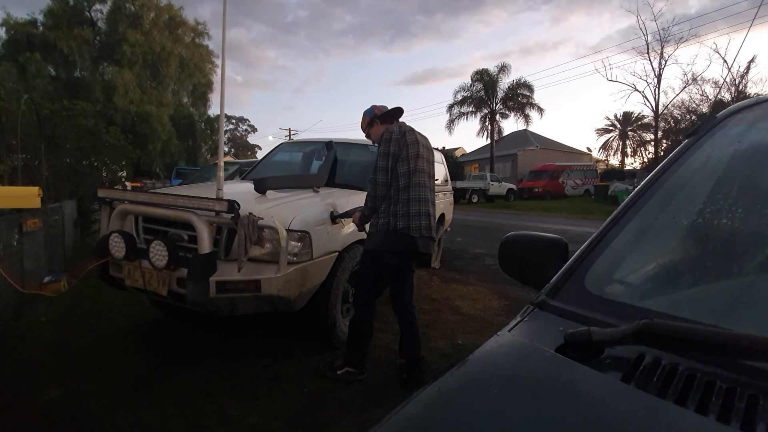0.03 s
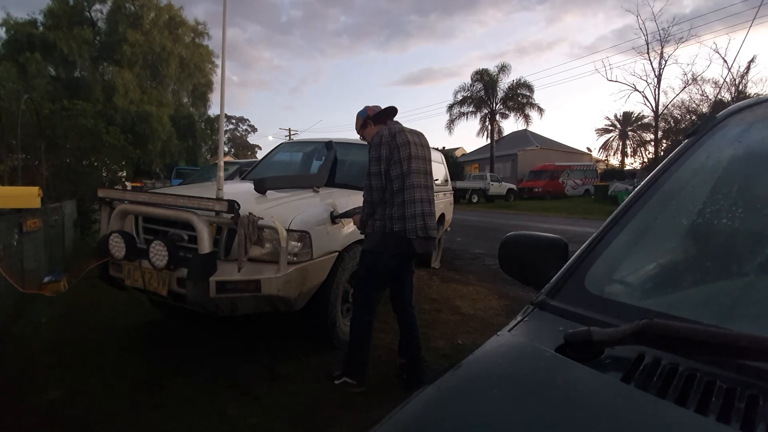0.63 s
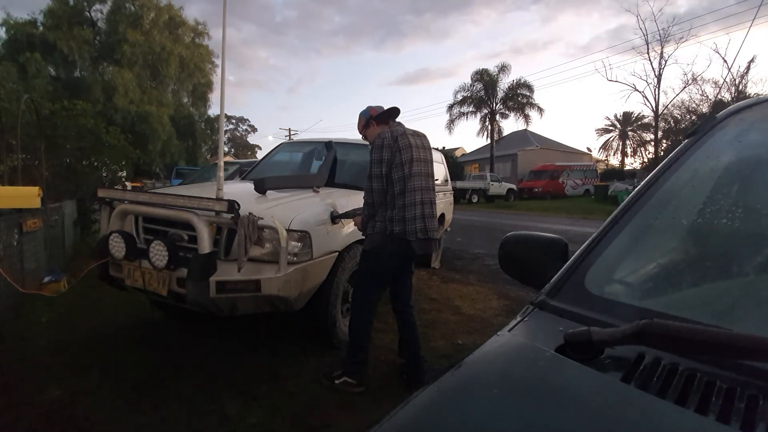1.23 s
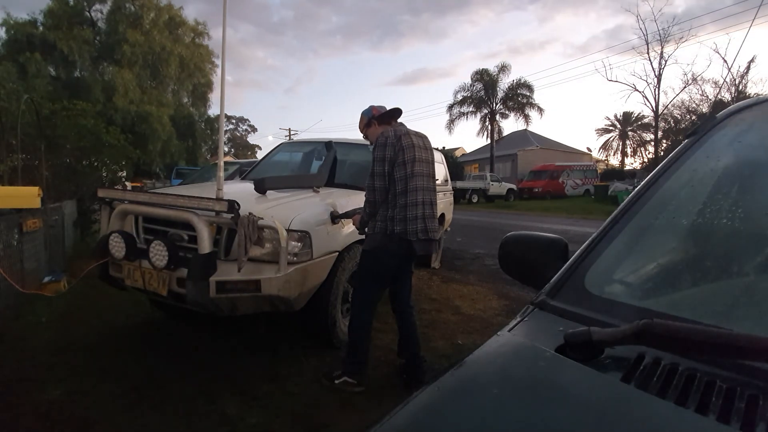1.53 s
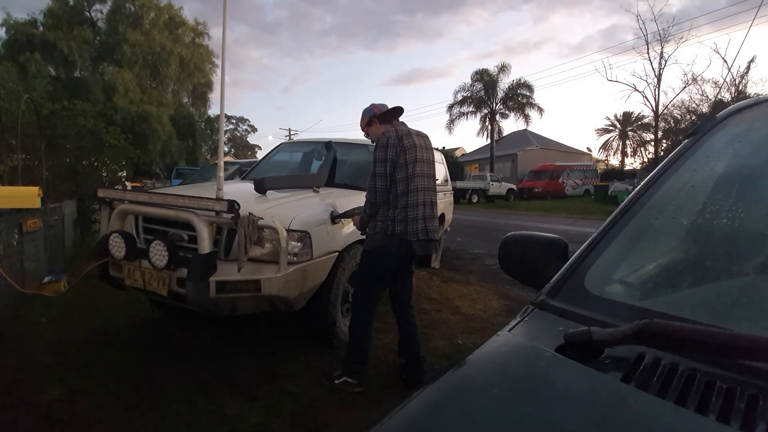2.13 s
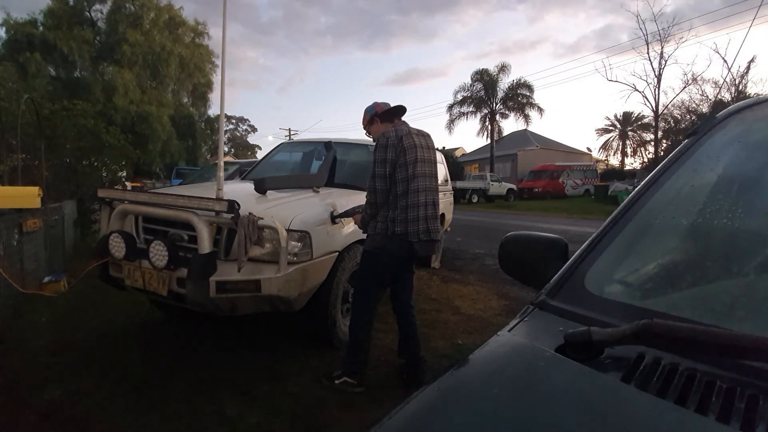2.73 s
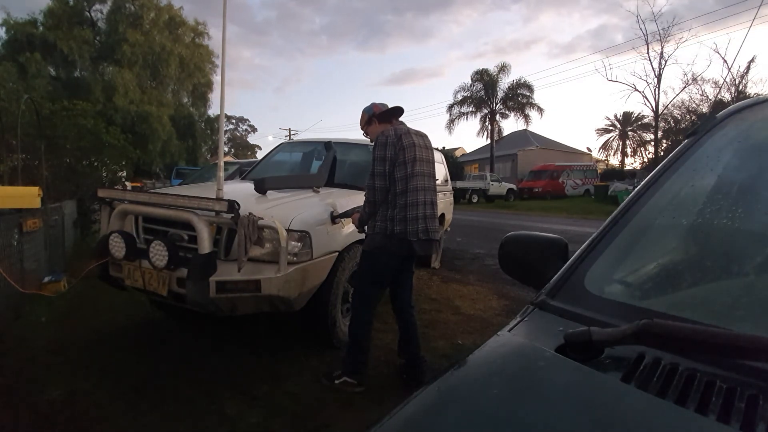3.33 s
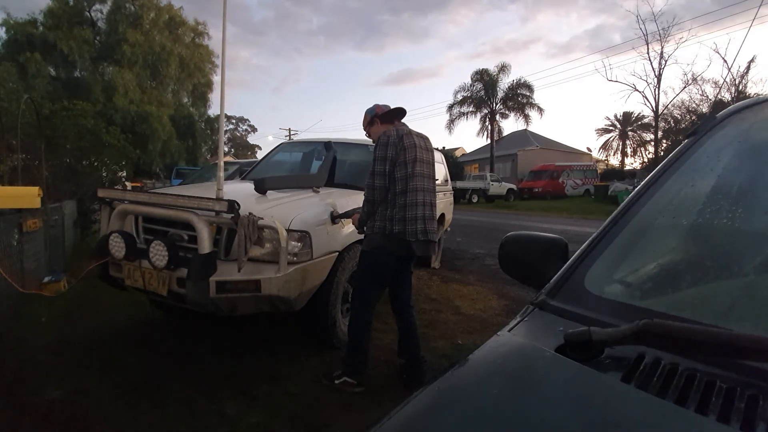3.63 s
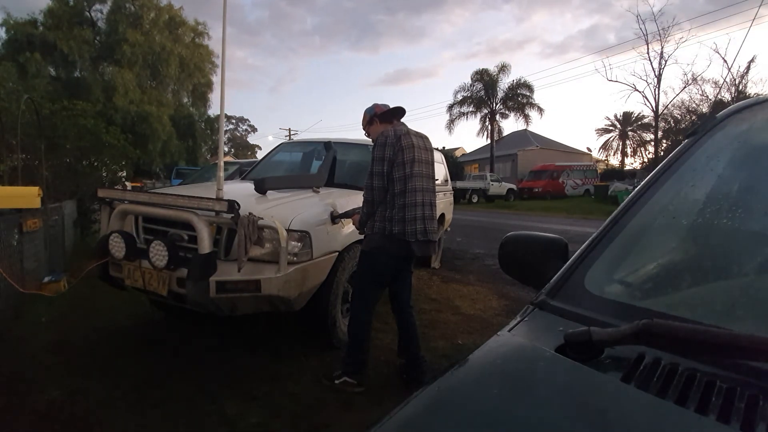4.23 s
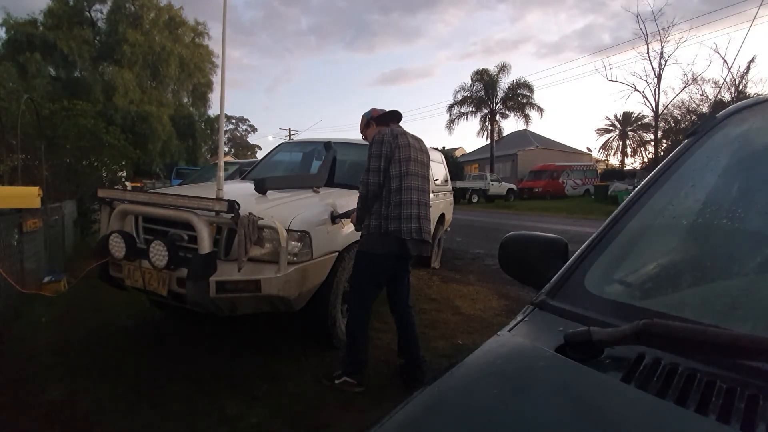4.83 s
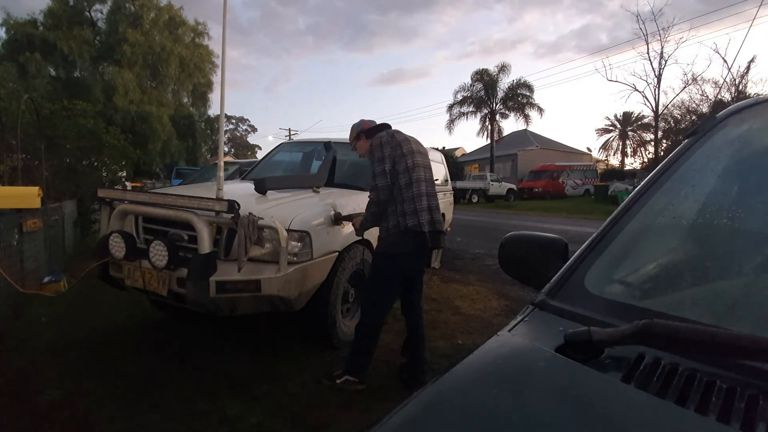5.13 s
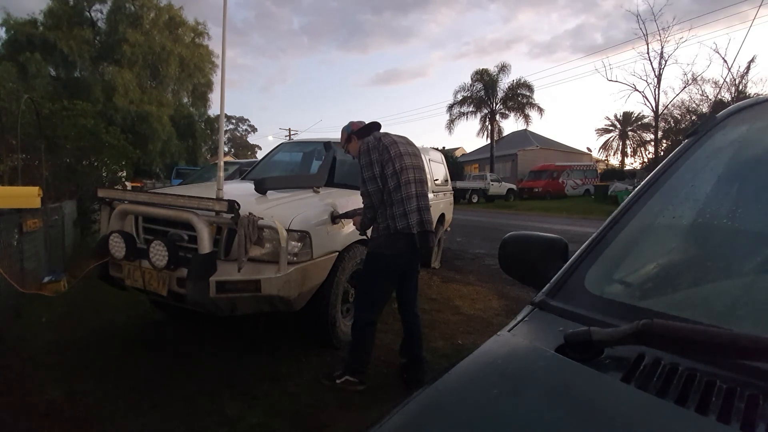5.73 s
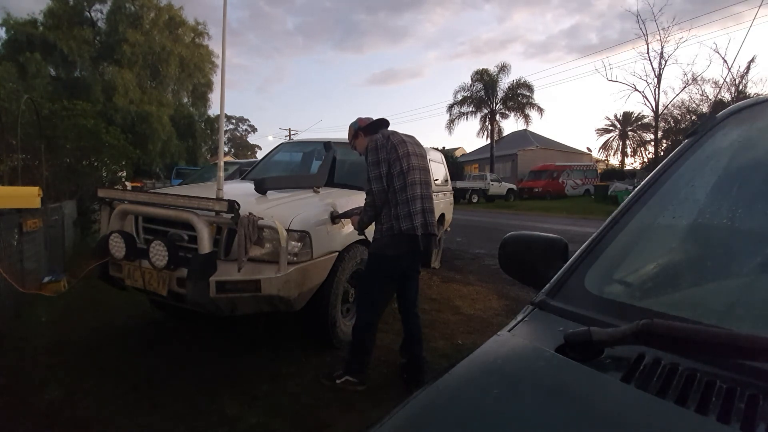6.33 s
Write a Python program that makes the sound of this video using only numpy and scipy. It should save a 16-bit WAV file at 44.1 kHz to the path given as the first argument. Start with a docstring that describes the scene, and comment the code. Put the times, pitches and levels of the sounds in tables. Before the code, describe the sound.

An electric drill drives a hole saw through a vehicle's sheet metal panel, outdoors and a few metres away. From the start there is a bright, continuous rasp with a metallic ring, and under it a high motor whine that sags and recovers. A short screech opens the cut. Between about 1 and 2 seconds the saw judders briefly and gives lower squeaks. High squeals, mostly sliding down in pitch, cluster from 1.6 to 2.4 seconds and from 2.8 to 3.8, with a tiny break in the cut at 3.5. More follow around 4.6 to 5.1. At 5.3 seconds the cutting stops, the motor coasts to rest and the saw ticks lightly in its groove. At 5.7 it bites again with a sharp knock, and the rasp continues, a little more unevenly and with short squeals, until about 6.6 seconds. The outdoor background is very faint.

```python
"""Hole saw through a vehicle's wing

Outdoors, a few metres away, an electric drill pushes a hole saw through sheet metal. The teeth rasp,
the panel and the saw cup ring, and squeals slide, mostly downward, as the teeth dig in again.
The drill coasts to rest once, the saw knocks in its groove, and the cut resumes."""
import sys
import numpy as np
from scipy import signal
from scipy.fft import rfft, irfft, next_fast_len
from scipy.io import wavfile
from scipy.ndimage import uniform_filter1d

SR = 44100
rng = np.random.default_rng(int(sys.argv[2]) if len(sys.argv) > 2 else 0)


def unload_wav(signal):
    """Save mono or channel-first audio to the path in sys.argv[1] as 16-bit WAV at rate SR, clipped to [-1, 1]."""
    wavfile.write(
        sys.argv[1],
        SR,
        np.round(np.clip(np.atleast_2d(signal).T, -1, 1) * 32767).astype(np.int16),
    )


N = 291049
SIZE = next_fast_len(N, True)
T, HZ = np.arange(N) / SR, np.fft.rfftfreq(SIZE, 1 / SR)
WORKING_SPEED_HZ = 3084  # pitch of the motor's whine at usual cutting speed
SQUEAL_FALL_S = 0.02

# Pushes into the cut. Each row: start and end in seconds, rasp boost in dB, rasp fade in dB per second,
# scrape boost in dB, attack and release in seconds.
PUSHES = [(-.01, 1.735, .9, 1.3, -1, .008, .012), (1.725, 3.54, 0, .4, 0, .012, .018),
          (3.574, 5.262, 0, 1.0, 0, .015, .03), (5.678, 6.7, -.2, 0, 2, .008, .02)]
# Squeals of the cutting edge. Each row: start, length and rise in seconds, first and settled pitch in Hz,
# relative level in dB, raggedness (1 is a locked tone, 2 or more a screech).
SQUEALS = [(.0, .22, 0.061, 4130, 3980, -51.5, 2), (1.18, 0.069, 0.024, 1350, 1280, -57, 1.2),
           (1.31, 0.2, .03, 1420, 1247, -62.5, 1.23), (1.62, .092, 0.023, 4540, 4100, -49, 2.4),
           (1.828, .13, .015, 5800, 5100, -57, 1.6), (1.932, 0.23, .025, 4650, 4300, -46.5, 0.98),
           (2.219, 0.14, .09, 3880, 3780, -54, 1.8), (2.677, 0.095, 0.029, 1450, 1242, -58, 1.3),
           (2.85, 0.25, 0.093, 3900, 4030, -48, 2), (3.05, 0.15, 0.065, 3950, 4100, -47, 1.6),
           (3.19, 0.27, .03, 4190, 4210, -45.5, 1.1), (3.576, 0.25, .015, 6570, 4370, -49, 1.24),
           (4.62, 0.29, .1, 4250, 4046, -53, 2.6), (4.951, 0.18, 0.059, 6040, 4050, -51.5, 1.96),
           (5.775, 0.098, 0.02, 4400, 4340, -49.5, 2.5), (5.86, 0.084, 0.037, 4090, 3960, -49, 1.8),
           (6.035, 0.057, .02, 6040, 5760, -49, 1.4), (6.239, 0.16, 0.083, 4460, 4340, -53, 2.1)]
# The saw binds and judders. Each row: start and length in seconds, first and last pitch in Hz,
# level in dB, strongest frequency in Hz, rasp lost in dB.
JUDDERS = [(1.124, 0.033, 394, 430, -55, 1100, -0.5), (1.542, 0.055, 403, 508, -52, 1430, 6.5),
           (1.762, 0.04, 636, 604, -50.5, 1300, 4), (1.79, 0.048, 591, 589, -56, 1800, 4.5),
           (4.557, 0.028, 482, 440, -54.5, 1500, 6), (5.132, .05, 763, 685, -57.5, 1040, 4.5),
           (5.697, 0.0087, 4120, 4050, -38.5, 4000, 5), (5.712, 0.046, 883, 830, -52.5, 1520, 3)]
# Fixed peaks that colour the rasp and ticks: metallic ring and a fine treble ripple.
# Each row: centre and width in Hz, relative level in dB.
TREBLE_PEAKS = [(2590, 80, -2), (2780, 80, -4), (3790, 130, -2), (4120, 130, -2), (4340, 170, -1),
                (4730, 70, -2), (5250, 110, -2), (6050, 130, -4), (6420, 100, -1), (6712, 85, 7),
                (7090, 120, 3), (7320, 200, 2), (8030, 200, 0), (9170, 140, 6), (9850, 100, 3),
                (10550, 200, -2), (11120, 180, 1), (11700, 200, -1), (12350, 230, 3), (13400, 180, 1),
                (13950, 200, -2), (14550, 250, 3)]


def amp(db):
    """Decibels to gain."""
    return 10 ** (np.asarray(db) / 20)


def unit(x):
    """Scales to rms 1."""
    return x / np.sqrt(np.mean(x ** 2) + 1e-20)


def levelled(x):
    """Takes out slow changes of level and keeps the fast ones."""
    return x / np.sqrt(uniform_filter1d(x ** 2, size=3000) + 1e-12)


def curve(points):
    """A line through (seconds, value) points, at every sample."""
    return np.interp(T, *np.transpose(points))


def swell_and_fade(start, end, attack, release):
    """Attack, hold and release between two moments."""
    return np.clip(np.minimum((T - start) / attack, (end - T) / release), 0, 1)


def plateau(middle, reach, steepness):
    """A flat-topped bump in time, 1 at its middle."""
    out, near = np.zeros(N), abs(T - middle) < 2 * reach
    out[near] = np.exp(-abs((T[near] - middle) / reach) ** steepness)
    return out


def spectrum(points):
    """Gain at every frequency, from (Hz, dB) points."""
    hz, db = np.transpose(points)
    return amp(np.interp(np.log(HZ + 1), np.log(hz + 1), db))


def modes(rows):
    """Power response of a set of peaks with steep skirts."""
    return sum(amp(db) ** 2 / (1 + ((HZ - hz) / width) ** 2) ** 2 for hz, width, db in rows)


def colour(x, gain):
    """Filters x and scales it to rms 1."""
    return unit(irfft(rfft(x, SIZE) * gain, SIZE)[:N])


def noise():
    """White noise."""
    return rng.standard_normal(N)


def wander(hz):
    """Random drift up to about hz, at rms 1."""
    a, b = rng.standard_normal((2, len(HZ)))
    return unit(irfft((a + 1j * b) / (1 + ((HZ / hz) ** 2) ** 2), SIZE)[:N])


def band(hz, width_hz, force):
    """Noise in a resonance driven by force, its centre following the curve hz."""
    phase = 2 * np.pi * np.cumsum(hz) / SR
    return force * (wander(width_hz) * np.cos(phase) + wander(width_hz) * np.sin(phase))


def street(level_db=-88):
    """A faint, steady outdoor bed, separate in each ear."""
    # Tone of the street. Each row: frequency in Hz, relative level in dB.
    street_eq = [(15, -59), (25, -33), (231, -31), (691, 3), (1540, -9), (2020, -15), (2930, 0),
                 (5420, -16), (15000, -49)]
    return amp(level_db) * np.array([colour(noise(), spectrum(street_eq)) for _ in range(2)])


def widen(middle, second_copy):
    """A second copy of the sound widens the stereo image, most in the bass and high treble."""
    # Stereo width. Each row: frequency in Hz, side level against the middle in dB.
    width_eq = [(60, 0.5), (110, -4), (200, 2), (380, -3.5), (700, -1.5), (1290, -11), (2380, -9.5),
                (4400, -9.5), (8120, -4.5), (15000, -3)]
    side = irfft(rfft(second_copy, SIZE) * spectrum(width_eq), SIZE)[:N]
    return np.array([middle + side, middle - side])


def motor(hz, whine_db=-78, air_db=-64.5, waver=0.004):
    """The fan whines, air and brushes hiss; both grow with speed, at these levels at working speed."""
    wavering_hz = hz * (1 + waver * wander(54.6))
    whine = np.sqrt(2) * np.sin(2 * np.pi * np.cumsum(wavering_hz) / SR)
    air_eq = [(30, -13), (300, -5.5), (1000, -7.0), (2500, -0.5), (6000, -5.0), (15000, 1)]
    air = colour(noise(), spectrum(air_eq))
    speed = np.maximum(hz, 0) / WORKING_SPEED_HZ
    return amp(whine_db) * speed ** 6 * whine + amp(air_db) * speed ** 1.7 * air


def knocks(rise_s=0.0022):
    """The saw knocks in its groove as it lets go, hangs loose and bites: metallic tick plus panel thud."""
    # Each row: time in seconds, tick and thud levels in dB, seconds to die away by 60 dB.
    hits = [(5.23, -69, -58, 0.057), (5.411, -67, -88, 0.055), (5.482, -74, -87, .03),
            (5.510, -65, -72, 0.051), (5.518, -69, -60, 0.066), (5.561, -87.5, -82, 0.17),
            (5.582, -68, -85, 0.051), (5.587, -82, -72, 0.066), (5.626, -67.5, -68, 0.043),
            (5.65, -78, -77, 0.087), (5.684, -56, -48, 0.082)]
    # Tone of an impact. Each row: frequency in Hz, relative level in dB.
    knock_eq = [(100, -40), (300, -21), (580, -8), (1250, -13), (2000, -6), (3400, 0.5), (5400, -2),
                (7500, -7.5), (15000, -12)]
    # Resonances of the struck panel. Each row: centre and width in Hz, relative level in dB.
    thud_modes = [(648, 155, -3), (1070, 130, -7), (1806, 360, 3.5), (2300, 140, -3), (2640, 90, -2)]
    tick = colour(noise(), spectrum(knock_eq) * np.sqrt(1 + modes(TREBLE_PEAKS)))
    thud = colour(noise(), spectrum(knock_eq) * np.sqrt(modes(thud_modes)))
    out, t = np.zeros(N), T[:SR // 4]
    for start, tick_db, thud_db, t60 in hits:
        at = int((start - rise_s) * SR) + np.arange(len(t))
        fade = amp(-60 * np.maximum(t - rise_s, 0) / t60) * np.minimum(t / rise_s, 1)
        out[at] += fade * (amp(tick_db) * tick[at] + amp(thud_db) * thud[at])
    return out


def judder(rough=0.0088, spread=0.47):
    """Brief stick-slip: a stack of harmonics, strongest where the panel gives way."""
    out, drift = np.zeros(N), 1 + rough * wander(250)
    for start, length, first_hz, last_hz, db, peak_hz, _ in JUDDERS:
        at = np.arange(int(start * SR), int((start + length) * SR))
        phase = 2 * np.pi * np.cumsum(np.linspace(first_hz, last_hz, len(at)) * drift[at]) / SR
        tone = sum(np.sin(k * phase) / (1 + (np.log(k * first_hz / peak_hz) / spread) ** 2)
                   for k in range(1, 6))
        out[at] += amp(db) * unit(tone) * np.sin(np.linspace(0, np.pi, len(at)))
    return out


def squeal(teeth_passed, bites, swing_hz=110, settle_s=0.072, steady=0.4, octave_db=-19, trim_db=-0.75):
    """The cutting edge sings and settles in pitch as it digs in; every tooth swells and bends the tone."""
    jitter_hz = 105 * wander(450)
    swing = swing_hz * np.cos(2 * np.pi * teeth_passed)
    swell = levelled(steady + uniform_filter1d(bites, size=70))
    out = np.zeros(N)
    for start, length, rise, first_hz, settled_hz, db, ragged in SQUEALS:
        at = np.flatnonzero((T >= start) & (T < start + length))
        hz = settled_hz + (first_hz - settled_hz) * np.exp(-((T[at] - start) / settle_s) ** 1.5)
        level = amp(db) * swell_and_fade(start, start + length, rise, SQUEAL_FALL_S)[at]
        phase = 2 * np.pi * np.cumsum(hz + swing[at] + ragged * jitter_hz[at]) / SR
        out[at] += level * (np.sin(phase) + amp(octave_db) * np.sin(2 * phase))
    return amp(trim_db) * np.sqrt(2) * swell * out


def tooth_bites(teeth_passed, uneven_db=2.5, hold=0.57, slop=0.11):
    """Each tooth bites quickly, a little early or late and with its own force, and lets go gradually."""
    position = teeth_passed + slop * wander(60)
    strengths = amp(uneven_db * np.clip(rng.standard_normal(4000), -2, 2))
    bites = strengths[position.astype(int) % 4000] * np.exp(-(position % 1) / hold)
    return unit(uniform_filter1d(bites, size=70))


def force_on_cut(bites, bite_share=0.23, grit_db=0.6, throb_db=0.5):
    """Steady feed, the bites of the teeth, an unsteady hand and tiny fractures."""
    return (1 - bite_share + bite_share * bites) * amp(throb_db * wander(53) + grit_db * wander(1600))


def tooth_contact(catch_s=0.0026):
    """How firmly the teeth touch: on during each push, less in a skip, which ends in an abrupt catch."""
    # The teeth ride up out of the cut. Each row: end and length in seconds, dip in dB (negative lifts).
    skips = [(0.492, 0.0066, -4.5), (1.499, 0.019, 3), (1.75, 0.042, 13.5), (1.839, 0.016, 6),
             (2.562, 0.037, 3.5), (3.545, 0.073, 7), (4.369, 0.0099, 6.5), (4.586, 0.014, 4.5),
             (4.962, .075, 2.5), (5.263, 0.13, 4.5), (6.05, 0.1, 4), (6.116, .023, 9), (6.159, 0.016, 9),
             (6.194, 0.018, 6), (6.315, 0.019, 2.5)]
    loss_db = sum(db * plateau(end, length, steepness=6.9) * np.clip((end - T) / catch_s, 0, 1)
                  for end, length, db in skips)
    pushing = sum(swell_and_fade(start, end, attack, release) for start, end, *_, attack, release in PUSHES)
    return amp(-loss_db) * pushing


def digging(usual_db=-55):
    """How much deeper than usual the teeth dig, as a control in dB."""
    # Depth of cut, one list a push. Each row: time in seconds, drive to the panel's ring in dB.
    ring_drive = [
        [(0.0, -55.5), (1.036, -52.5), (1.046, -49.5), (1.102, -60.5), (1.122, -54.5), (1.382, -58.5),
         (1.392, -52.5), (1.434, -59.5), (1.59, -54), (1.61, -60.5), (1.684, -55.5), (1.7, -63)],
        [(1.83, -63), (1.982, -58), (2.098, -60.5), (2.23, -52.5), (2.276, -59), (2.396, -50.5), (2.564, -56),
         (2.616, -54.5), (3.136, -54), (3.304, -57.5), (3.326, -54.5), (3.5, -62.5)],
        [(3.59, -60.5), (3.772, -60), (3.828, -55), (4.21, -53.5), (4.232, -57.5), (4.83, -54.5),
         (4.944, -64.5), (4.972, -59.5), (5.16, -54), (5.202, -64.5), (5.234, -58), (5.24, -64)],
        [(5.69, -51.5), (5.922, -59.5), (6.022, -70), (6.084, -56), (6.102, -71), (6.134, -56.5), (6.156, -71),
         (6.164, -61.5), (6.202, -66.5), (6.236, -56.5), (6.548, -62), (6.6, -54)],
    ]
    return curve(np.vstack(ring_drive)) - usual_db


def binding():
    """Decibels of rasp lost while the saw sticks and judders."""
    return sum(lost_db * plateau(start + length / 2, reach=0.44 * length, steepness=5.9)
               for start, length, *_, lost_db in JUDDERS)


def squeal_ducking(reference_db=-52):
    """Level that the squeals take from the cut: 1 dB for a middling squeal, more for louder ones."""
    return sum((amp(db - reference_db) * swell_and_fade(start, start + length, rise, SQUEAL_FALL_S)) ** 2
               for start, length, rise, _, _, db, _ in SQUEALS)


def engagement(whine_hz, sway_hz=11, max_sag=0.1204, cup_fade_db_per_s=0.54):
    """The cut's layer levels and chatter pitch follow depth, motor load and a swaying hand."""
    depth, bound, duck = digging(), binding(), squeal_ducking()
    sag = np.minimum(1 - whine_hz / WORKING_SPEED_HZ, max_sag)  # loss of speed that counts as load
    push_rasp, push_scrape = np.zeros((2, N))
    for start, _, rasp_boost, fade, scrape_boost, *_ in PUSHES:
        push_rasp = np.where(T >= start, rasp_boost - fade * (T - start), push_rasp)
        push_scrape = np.where(T >= start, scrape_boost, push_scrape)
    choke = 0.22 * bound
    sunk = cup_fade_db_per_s * T  # the cup rings less as it sinks into its groove
    rasp_db = -44.5 + push_rasp - bound - 0.14 * duck + 0.7 * wander(sway_hz)
    panel_db = -56 + 1.38 * depth - choke + wander(sway_hz)
    scrape_db = -65.5 + push_scrape + 0.49 * bound
    cup_db = -56 + 0.54 * depth - choke - duck - sunk + 2.5 * wander(sway_hz)
    grind_db = -58 + 0.5 * depth + 16 * sag - choke - duck
    chatter_hz = 1800 * (1 - 0.5 * sag) - 6 * depth
    return rasp_db, panel_db, scrape_db, cup_db, grind_db, chatter_hz


def friction(force, gain, patchy_db=2.0):
    """Noise of the cut; the turning point of contact favours now these resonances, now those."""
    frames = signal.stft(colour(noise() * force, gain), nperseg=512)[2]
    patches = uniform_filter1d(rng.standard_normal(frames.shape), size=3, axis=0)
    patches = unit(uniform_filter1d(patches, size=5, axis=1))
    return unit(signal.istft(frames * amp(patchy_db * patches), nperseg=512)[1][:N])


def panel_ring(force, chatter_hz, width_hz=330):
    """The chatter of the teeth rings whichever modes of the sheet it slides through."""
    # Resonances of the panel. Each row: centre and width in Hz, relative level in dB.
    panel_modes = [(1050, 70, 3), (1284, 96, 3.5), (1494, 32, 1), (1627, 34, -3), (1790, 36, 4),
                   (1978, 46, 4.5), (2170, 93, -2)]
    chatter = band(chatter_hz, width_hz, force)
    return levelled(colour(chatter, np.sqrt(0.15 + modes(panel_modes))))


def cutting(force, controls, cup_hz=3406, cup_width_hz=105):
    """Fractures under the teeth hiss directly and ring the panel and the saw cup."""
    # Tones of the bright rasp, the low scrape and the coarse grinding of a deep cut.
    # Each row: frequency in Hz, relative level in dB.
    rasp_eq = [(300, -20.5), (1000, -14.5), (1500, -3.5), (2300, 0.5), (2950, -5), (3900, 3.5), (5200, .5),
               (7500, 0.5), (8500, -1), (11500, -0.5), (15500, -1)]
    scrape_eq = [(15, -5), (60, -6), (150, -4.5), (300, -4.5), (480, -1), (800, -2.5), (1080, 1.5),
                 (1400, -5.5), (2500, -35)]
    grind_eq = [(900, -32), (1700, -4), (2200, -6), (2850, 0), (3600, -3.5), (4600, -1.5), (6500, -19),
                (12000, -35)]
    rasp_db, panel_db, scrape_db, cup_db, grind_db, chatter_hz = controls
    rasp = amp(rasp_db) * friction(force, spectrum(rasp_eq) * np.sqrt(1 + modes(TREBLE_PEAKS)))
    scrape = amp(scrape_db + 1.6 * wander(12)) * friction(force, spectrum(scrape_eq))
    panel = panel_ring(force, chatter_hz) * amp(panel_db + 0.97 * wander(21))
    cup = amp(cup_db) * unit(band(np.full(N, cup_hz), cup_width_hz, force))
    grind = amp(grind_db) * friction(force, spectrum(grind_eq))
    return rasp + scrape + panel + cup + grind


def scene(whine_cycles_per_tooth=25):
    """The motor's speed sets the rate of the teeth, which drive rasp and squeal."""
    # The motor sags under load, coasts to rest and restarts. Each row: time in seconds, whine in Hz.
    motor_speed = [(0, 3294), (1.5, 2790.5), (2.1, 3248.5), (2.5, 2756.5), (3.45, 3149), (3.6, 3583),
                   (3.73, 3539), (3.95, 2749), (5.262, 2883), (5.33, 2301), (5.5, 1102), (5.56, 0),
                   (5.675, 2), (5.72, 2899.5), (6.6, 3199.5)]
    whine_hz = curve(motor_speed)
    teeth_passed = np.cumsum(whine_hz) / whine_cycles_per_tooth / SR
    bites = tooth_bites(teeth_passed)
    force, contact, controls = force_on_cut(bites), tooth_contact(), engagement(whine_hz)
    # both copies share the same rhythm but differ in fine grain
    middle, second_copy = (contact * cutting(force, controls) + squeal(teeth_passed, bites)
                           + judder() + motor(whine_hz) + knocks() for _ in range(2))
    return widen(middle, second_copy) + street()


def record(dry, cutoff_hz=15850):
    """A steep low-pass trims the highest treble."""
    lowpass = signal.firwin(511, cutoff_hz, window=("kaiser", 9), fs=SR)
    return signal.oaconvolve(dry, lowpass[None], "same")


dry = scene()
out = record(dry)
unload_wav(out)
```